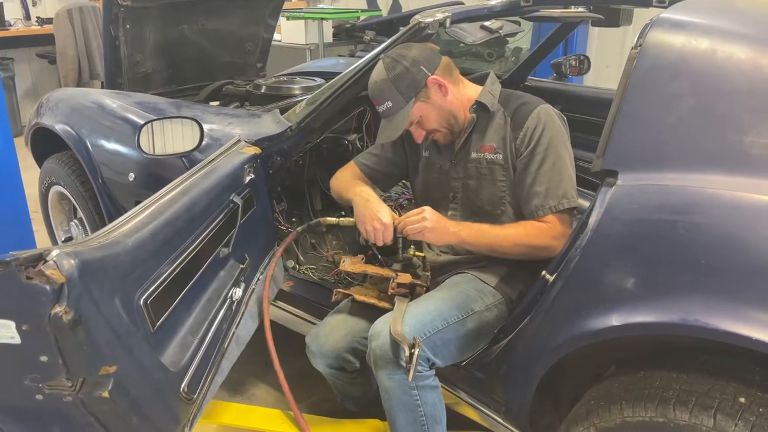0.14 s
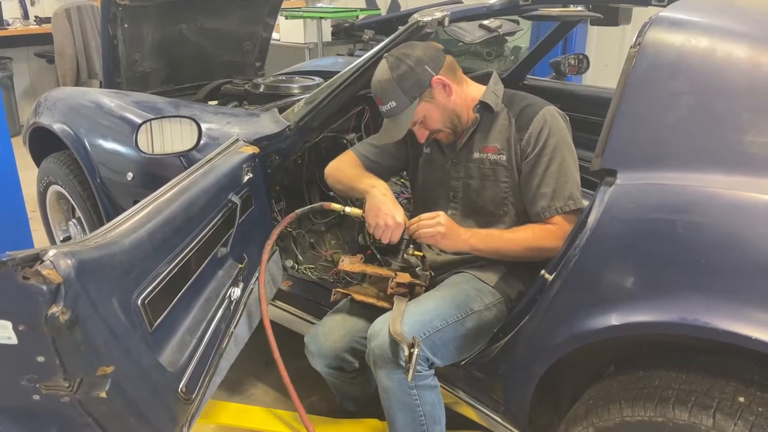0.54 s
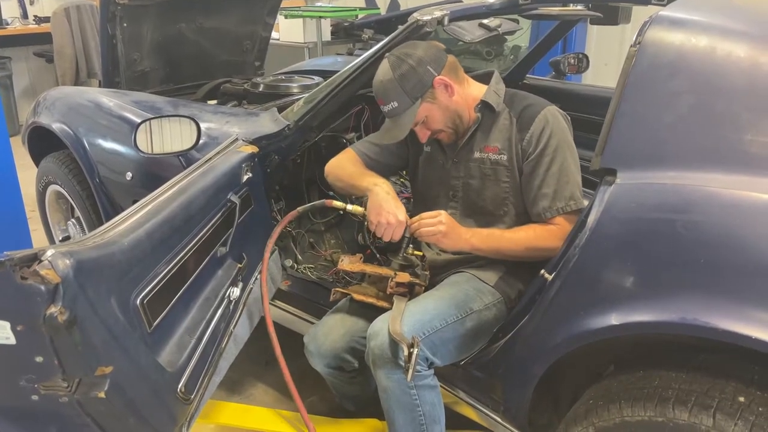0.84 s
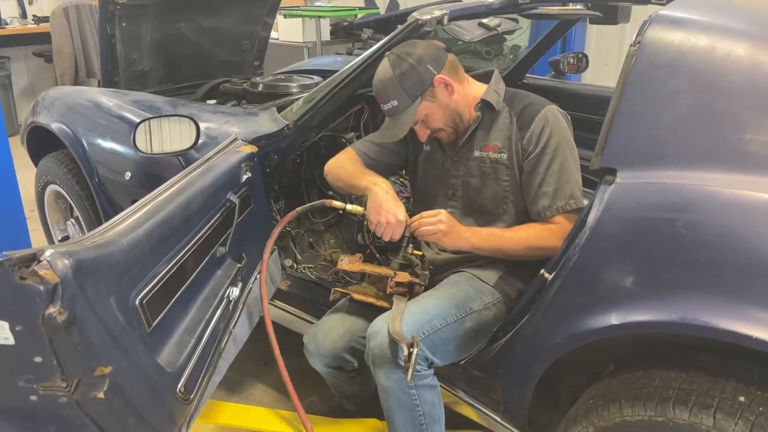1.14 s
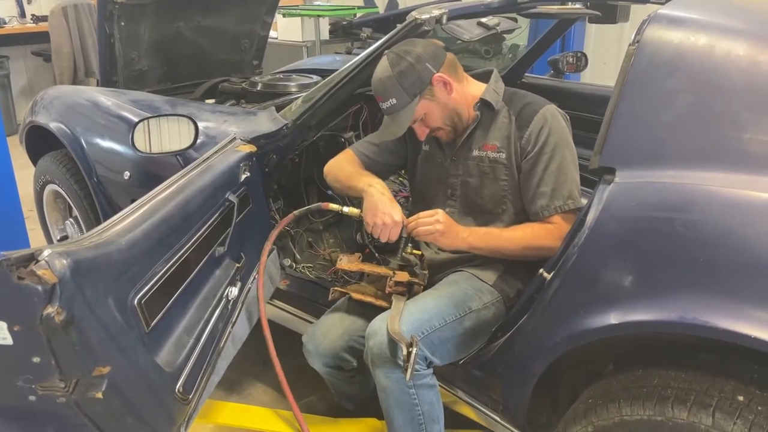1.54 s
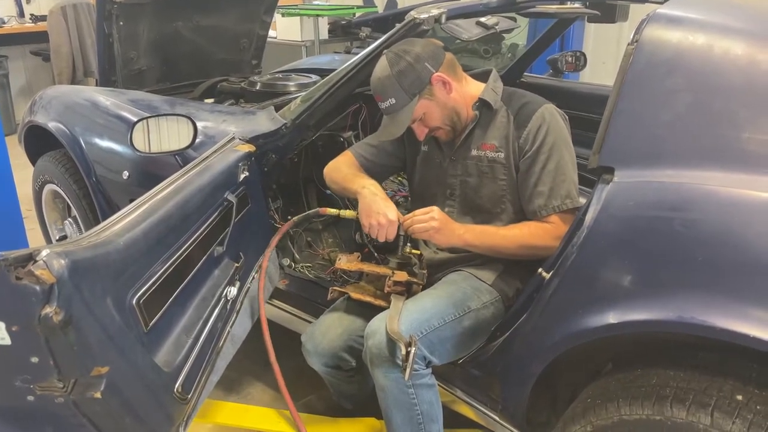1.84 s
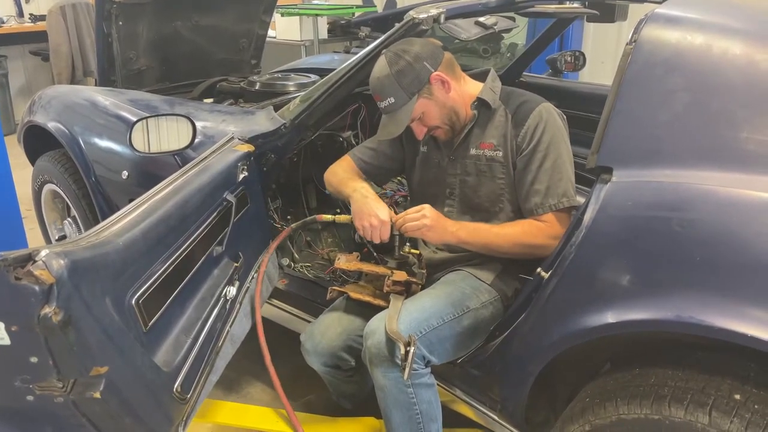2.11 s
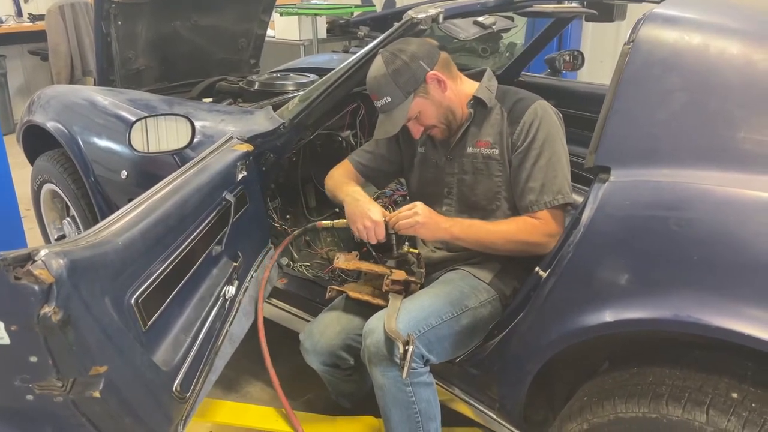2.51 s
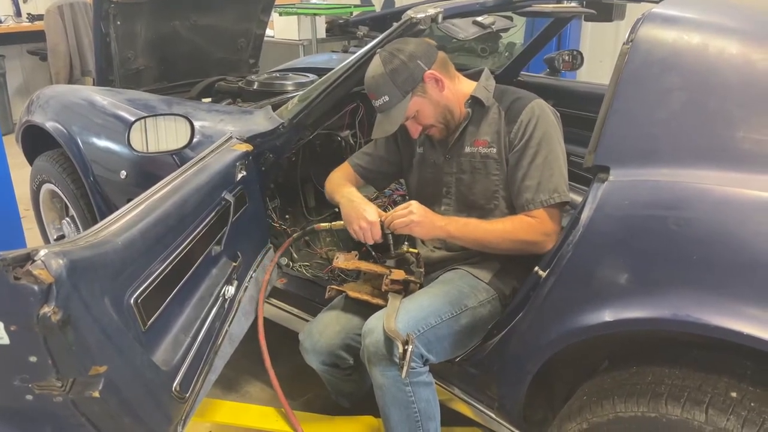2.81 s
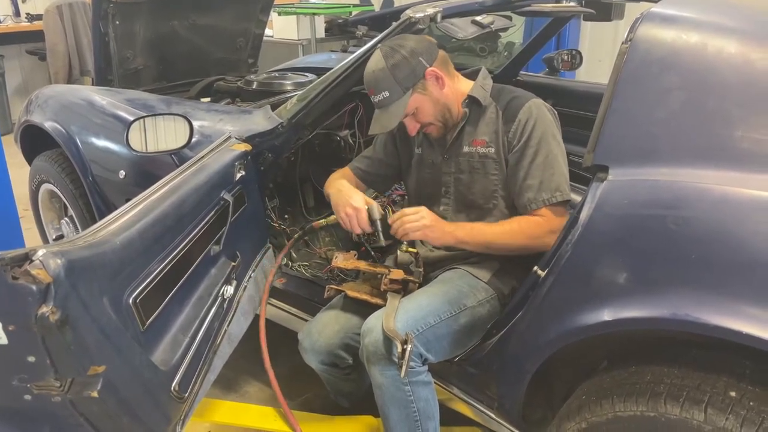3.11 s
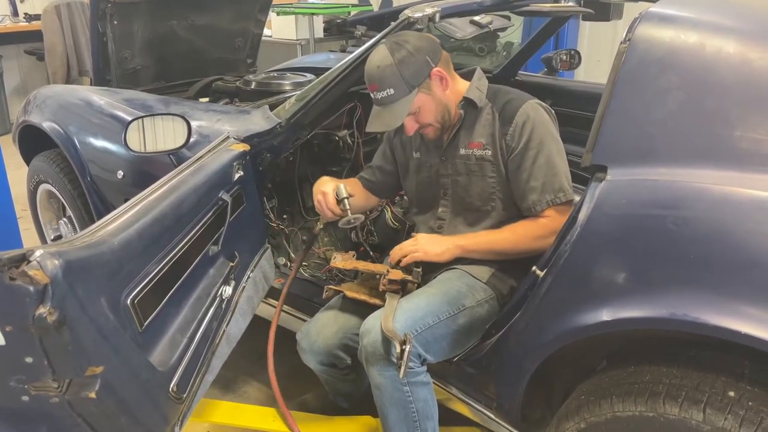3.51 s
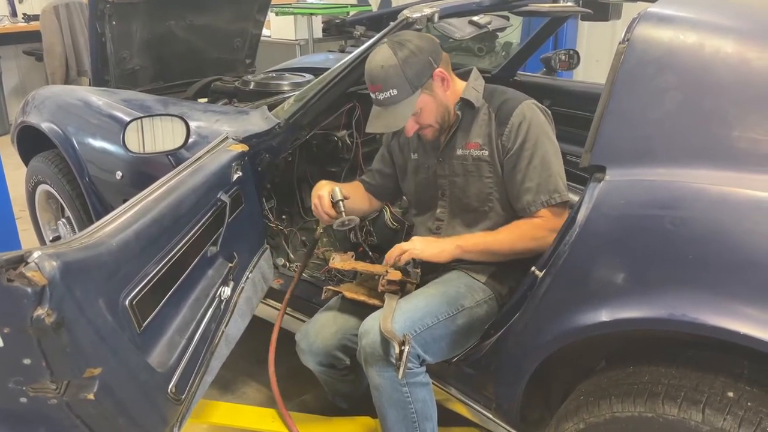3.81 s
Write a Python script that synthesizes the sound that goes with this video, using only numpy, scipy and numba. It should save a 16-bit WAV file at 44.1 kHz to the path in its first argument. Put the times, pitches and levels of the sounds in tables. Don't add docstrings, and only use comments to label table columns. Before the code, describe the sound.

A pneumatic cut-off tool whines and grinds harshly on steel, then stops with a falling moan.

```python
import sys
import numpy as np
from scipy import signal
from scipy.fft import rfft, irfft
from scipy.io import wavfile
from scipy.ndimage import uniform_filter1d
from numba import njit

SR = 44100
rng = np.random.default_rng(int(sys.argv[2]) if len(sys.argv) > 2 else 0)


def invert_db(x):
    u = np.asarray(x, float) / 20
    return 10 ** u


def master(y):
    cut = np.clip(np.atleast_2d(y).T, -1, 1)
    pcm = np.round(cut * 32767)
    wavfile.write(sys.argv[1], SR, pcm.astype(np.int16))


N = 174195
LEAD_IN = SR // 2
TOTAL = N + LEAD_IN

# t/s, vane rate aimed for f/Hz, wheel bite level/dB, exhaust note level/dB
HAND_LOAD = [(0.0, 592.3, -0.7, 2.5), (0.029, 625, -1.5, -15), (0.079, 596, 1.5, 0.5),
             (0.151, 568.3, 1, -9.5), (0.211, 535, 3.5, -9), (0.241, 526.7, 1.5, 6), (0.291, 564, 0.5, 4),
             (0.33, 564.8, 2, -22.5), (0.43, 576.0, -4.5, -21), (0.46, 589, 7, 12.5),
             (0.489, 554, 2.5, -9.0), (0.54, 511.6, 3, 3), (0.66, 526.9, 3.3, 1.5), (0.749, 517.4, 5, -7),
             (0.8, 499.4, 1.9, 3), (0.93, 586.2, 1, 1), (1.06, 564.4, 7, -4.5), (1.09, 558.5, 1.5, -20),
             (1.13, 592.2, 1, 5), (1.16, 537, 6, -1.5), (1.2, 547.5, 1.2, 5), (1.3, 604.6, -9.5, 0),
             (1.34, 633.3, 0.5, -5), (1.37, 602.2, 0.5, -39), (1.41, 571, 5.5, 19), (1.44, 525.2, 2.0, -13),
             (1.47, 547, 3.7, 4), (1.53, 522.4, 2.5, 5), (1.62, 512.7, 1, -10), (1.659, 562.5, 1, 7),
             (1.7, 618.6, -4, 3.0), (1.75, 625.0, 6, -12), (1.78, 592.0, 0.5, -34), (1.81, 543, 2.4, -0.5),
             (1.9, 593.5, -2, 1), (1.93, 576.2, 3.5, -4), (2.0, 552.8, 1.5, -5.5), (2.08, 615.3, -2.5, 5),
             (2.111, 585, 3.0, -6), (2.16, 549.0, 1.8, -14), (2.21, 551.7, 3, 2), (2.33, 521.7, 3, 2),
             (2.41, 568.3, -3.5, 5.5), (2.45, 568, 3.3, -15), (2.51, 540.0, 1, 8), (2.58, 549.8, 4, -3.5),
             (2.66, 518.3, 2.5, 1.5), (2.77, 592, -1, -1.5), (2.82, 547.8, 1.7, -0.5), (2.92, 582.0, -2, 3)]
# multiple of vane rate, running level/dB, extra braking level/dB
EXHAUST_TONES = [(1, -31, 1.5), (2, -35, 0), (3, -35, 0), (4, -33.5, -8), (5, -39, -6), (6, -44, -8),
                 (7, -46, -8)]
# f/Hz, level/dB
MUFFLER = [(150, -12), (260, -6), (370, -1), (520, -2), (730, 5), (870, -8), (1050, 7), (1500, -3),
           (1900, -14)]
# f/Hz, width/Hz, level/dB
BODY_MODES = [(1520, 460, -17), (2587, 230, -14), (3440, 170, -16), (4196, 95, -7), (5075, 168, 3),
              (5570, 450, -7.5), (6275, 550, -7), (6940, 330, -5.5), (8640, 107, -7), (9320, 110, -8),
              (11450, 45, -0.5), (12620, 160, -3.5), (13840, 2300, -9.5), (14900, 2800, -15)]
# f/Hz, width/Hz, level/dB
STEEL_MODES = [(2480, 28, -7), (2727, 93, -8.5), (2844, 20, -11), (3307, 32, -6), (4284, 36, -12.5),
               (5032, 29, 1), (5130, 28, 0.5), (5487, 36, 0.5), (5566, 80, 1.5), (5676, 66, 0.5),
               (5934, 38, -16), (6650, 47, -7), (7000, 180, -4), (7045, 83, 1.5)]
# f/Hz, level/dB
AIR_RUSH = [(60, -25.5), (350, -22), (690, -18), (900, -12), (1330, -16.5), (2700, -4.5), (7000, 0),
            (15500, -7)]
# f/Hz, width/Hz
HOLLOWS = [(680, 89), (1330, 160), (3900, 250), (7450, 84), (8050, 550), (10100, 550), (11950, 390),
           (13100, 750), (14900, 330)]
# t/s, level/dB
KNOCKS = [
    (1.79, -50),
    (3.01, -40),
]
# f/Hz, T60/s
ROOM_T60 = [(125, 0.38), (400, 1.07), (1000, 0.91), (1800, 1.234), (5000, 1.194), (8000, 0.85),
            (12000, 0.52), (16000, 0.59)]
# f/Hz, level/dB
TONE_ROOM = [(250, -5.5), (450, -3.5), (580, -3.5), (720, 1), (870, 7), (1050, -2.5), (1400, -7),
             (2000, -6)]
# f/Hz, rms level/dB
HUM = [(120, -48), (240, -53.5)]
# f/Hz, level/dB
ROOM_FLOOR = [(30, -41), (80, -11.5), (200, -15.5), (500, -23.5), (1220, -30), (4000, -43), (8000, -49),
              (16000, -49)]

RELEASE_S, BRAKE_S = 2.988, 0.098
SPEED_LAG_S, BITE_LAG_S = 0.02, 0.014
MOAN_DB, MOAN_RISE_S, MOAN_FADE_S = 9.5, 0.002, 0.085
TONE_FLUTTER_DB, BRAKE_FLUTTER_DB = 2.5, -1.5
GRIND_STOP_S = 0.059
BODY_DB, STEEL_DB, AIR_DB = -22.5, -25, -21
BODY_PATCHY_DB, STEEL_PATCHY_DB, MODE_DRIFT = 1.2, 3, 0.004
GRIT_DB, GRIT_CAP = 2.5, 3.5
WOBBLE_DB, WOBBLE2_DB = 4, 1.5
FREE_AIR_DB_PER_HZ = 0.04
SAG_MID_HZ, SAG_SPAN_HZ = 550, 160
HOLLOW_DEPTH, HOLLOW_WANDER, HOLLOW_DRIFT = 0.58, 0.2, 0.016
KNOCK_HZ, KNOCK_S = 194, 0.033
ROOM_DB, ROOM_DELAY_S, ROOM_RISE_S = -2, 0.02, 0.0024
FLOOR_DB = -49
AGC_KNEE_DB, AGC_SLOPE, AGC_S = -44, 0.33, 0.12
LOW_HZ, TOP_HZ = 58, 15720
MASK_DB, QUIET_TOP_HZ, QUIET_SHARE = -4.2, 15000, 0.2


def level(x, db):
    return x * invert_db(db) / np.sqrt(np.mean(x ** 2))


def lag(x, s):
    a = np.exp(-1 / (s * SR))
    return x[0] + signal.lfilter([(1 - a) ** 2], [1, -2 * a, a * a], x - x[0])


def walk(rate):
    hold = int(SR / rate)
    steps = np.repeat(rng.standard_normal(TOTAL // hold + 1), hold)
    return 1.505 * uniform_filter1d(uniform_filter1d(steps, hold), hold)[:TOTAL]


def curve(table, hz):
    table = np.array(table, float)
    return np.interp(np.log(hz + 1), np.log(table[:, 0]), table[:, 1])


def colour(x, table):
    hz = np.arange(TOTAL // 2 + 1) * SR / TOTAL
    return irfft(rfft(x) * invert_db(curve(table, hz)), TOTAL)


@njit
def moving_band(x, hz, width):
    y, band, low = np.empty(len(x)), 0., 0.
    for i in range(len(x)):
        g, k = np.tan(np.pi * hz[i] / SR), width / hz[i]
        v = (band + g * (x[i] - low)) / (1 + g * (g + k))
        band, low, y[i] = 2 * v - band, low + 2 * g * v, k * v
    return y


def ring(x, modes, patchy_db):
    out = 0
    for k, (hz, width, db) in enumerate(modes):
        gain = (-1) ** k * invert_db(db + patchy_db * walk(11))
        out = out + gain * moving_band(x, hz * (1 + MODE_DRIFT * walk(6)), 1. * width)
    return out


def motor(t):
    rows = np.array(HAND_LOAD, float)
    step = np.clip(np.searchsorted(rows[:, 0], t) - 1, 0, None)
    after = np.maximum(t - RELEASE_S, 0)
    hz = lag(rows[step, 1], SPEED_LAG_S) * (1 + 0.002504 * walk(60)) * np.exp(-after / BRAKE_S)
    return hz, lag(rows[step, 2], BITE_LAG_S), lag(rows[step, 3], BITE_LAG_S), after


def grind(hz, turns, bite_db, after):
    free_db = FREE_AIR_DB_PER_HZ * np.maximum(hz - SAG_MID_HZ, 0)
    wobble_db = WOBBLE_DB * np.cos(2 * np.pi * turns) + WOBBLE2_DB * np.cos(4 * np.pi * turns + 1)
    strike_db = GRIT_DB * np.minimum(rng.exponential(size=TOTAL), GRIT_CAP)
    grit = rng.standard_normal(TOTAL) * invert_db(strike_db + wobble_db)
    body = level(ring(grit, BODY_MODES, BODY_PATCHY_DB), BODY_DB)
    steel = level(ring(grit, STEEL_MODES, STEEL_PATCHY_DB), STEEL_DB)
    cut = (body + steel) * invert_db(bite_db + 0.6 * walk(18))
    gusts = rng.standard_normal(TOTAL) * invert_db(0.4 * wobble_db + free_db + 1.3 * walk(16))
    air = level(colour(gusts, AIR_RUSH), AIR_DB) * invert_db(0.57 * bite_db)
    return (cut + air) * np.exp(-after / GRIND_STOP_S)


def hollow(x, hz):
    pressed = np.clip((SAG_MID_HZ - hz) / SAG_SPAN_HZ, -0.5, 0.25)
    for centre_hz, width in HOLLOWS:
        depth = np.clip(HOLLOW_DEPTH + HOLLOW_WANDER * walk(14) + pressed, 0, 1)
        x = x - depth * moving_band(x, centre_hz * (1 + HOLLOW_DRIFT * walk(10)), 1. * width)
    return x


def exhaust(hz, turns, voice_db, after):
    swell, out = 1 - np.exp(-after / MOAN_RISE_S), 0
    for k, db, brake_db in EXHAUST_TONES:
        flutter_db = (TONE_FLUTTER_DB + swell * BRAKE_FLUTTER_DB) * walk(45)
        running_db = voice_db * (1 - swell) / k ** 2
        moan_db = swell * (MOAN_DB + brake_db + curve(MUFFLER, k * hz))
        tone = np.sin(2 * np.pi * (k * 5 * turns + rng.random()))
        out = out + invert_db(db + flutter_db + running_db + moan_db) * tone
    return np.sqrt(2) * out * np.exp(-(after / MOAN_FADE_S) ** 2)


def knocks(t):
    env = sum(invert_db(db) * np.exp(-((t - s) / KNOCK_S) ** 2) for s, db in KNOCKS)
    thud = signal.lfilter(*signal.iirpeak(KNOCK_HZ, 1, SR), rng.standard_normal(TOTAL))
    return env * level(thud, 0)


def garage(x):
    t, tail = np.arange(3 * SR // 2) / SR, 0
    for hz in 60 * 2 ** np.arange(0, 8.5, 0.5):
        edges = [hz / 2 ** 0.25, hz * 2 ** 0.25]
        sos = signal.butter(2, edges, "band", fs=SR, output="sos")
        decay = invert_db(-60 * t / curve(ROOM_T60, hz))
        tail = tail + signal.sosfilt(sos, rng.standard_normal(len(t))) * decay
    tail = tail * (1 - np.exp(-np.maximum(t - ROOM_DELAY_S, 0) / ROOM_RISE_S))
    return signal.fftconvolve(x, tail * invert_db(ROOM_DB) / np.sqrt(np.sum(tail ** 2)))[:TOTAL]


def background(t):
    hum = 0
    for hz, db in HUM:
        hum = hum + np.sqrt(2) * invert_db(db + 0.7 * walk(20)) * np.sin(2 * np.pi * hz * t)
    rumble = level(colour(rng.standard_normal(TOTAL), ROOM_FLOOR), FLOOR_DB)
    return hum + rumble * invert_db(0.6 * walk(9))


def scene():
    t = (np.arange(TOTAL) - LEAD_IN) / SR
    hz, bite_db, voice_db, after = motor(t)
    turns = np.cumsum(hz) / SR / 5
    cut = hollow(grind(hz, turns, bite_db, after), hz)
    tones = exhaust(hz, turns, voice_db, after) + knocks(t)
    room = garage(cut + colour(tones, TONE_ROOM))
    tool = (tones + cut + room) * invert_db(7.5)
    return np.tile((tool + background(t))[LEAD_IN:], (2, 1))


def thin_treble(x):
    hz, _, z = signal.stft(x, SR, nperseg=1024)
    power = uniform_filter1d(np.abs(z) ** 2, size=3, axis=1)
    band = uniform_filter1d(power, size=5, axis=0)[np.arange(len(hz)) // 5 * 5]
    neighbours = uniform_filter1d(power, size=50, axis=0)
    hz = hz[:, None]
    keep = (band > neighbours * invert_db(2 * MASK_DB)) | (hz < 6600)
    total = power.sum(axis=0)
    keep &= (total > QUIET_SHARE * np.median(total)) | (hz < QUIET_TOP_HZ)
    return signal.istft(z * keep * (hz < TOP_HZ), SR, nperseg=1024)[1][:len(x)]


def roll_off(x):
    return signal.sosfilt(signal.butter(12, 17080, fs=SR, output="sos"), x)


def record(dry):
    loud_db = 10 * np.log10(uniform_filter1d(dry[0] ** 2, size=2048) + 1e-12)
    gain_db = lag(-AGC_SLOPE * np.maximum(loud_db - AGC_KNEE_DB, 0), AGC_S)
    low_cut = signal.butter(3, LOW_HZ, "high", fs=SR, output="sos")
    mono = signal.sosfilt(low_cut, thin_treble(dry[0] * invert_db(gain_db)))
    return roll_off(np.tile(mono, (2, 1)))


dry = scene()
out = record(dry)
master(out)
```